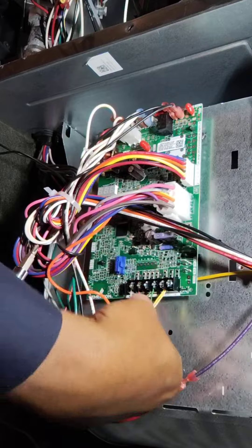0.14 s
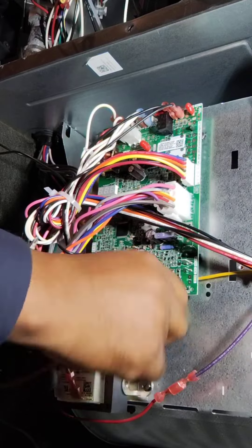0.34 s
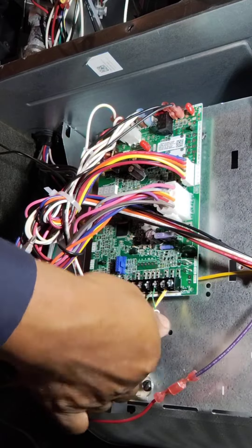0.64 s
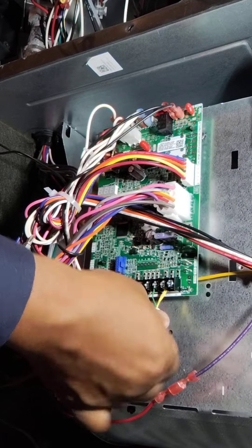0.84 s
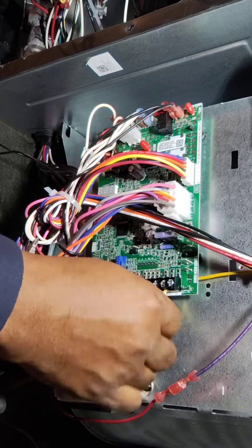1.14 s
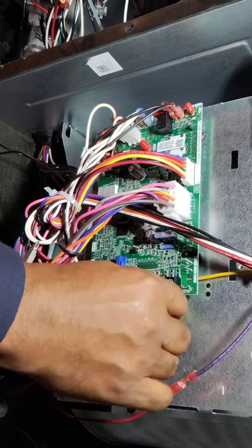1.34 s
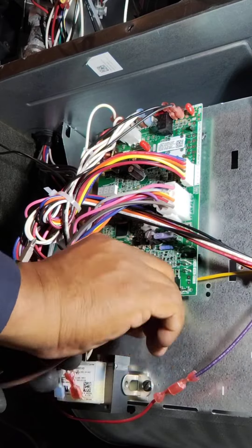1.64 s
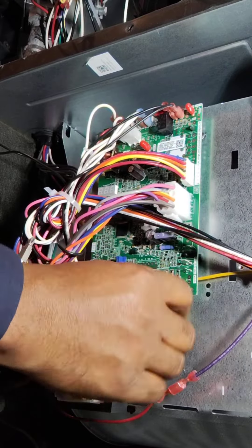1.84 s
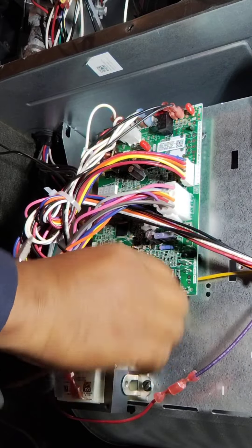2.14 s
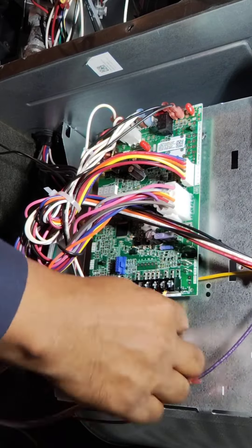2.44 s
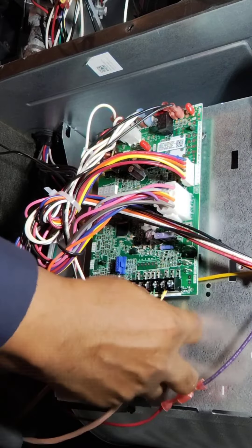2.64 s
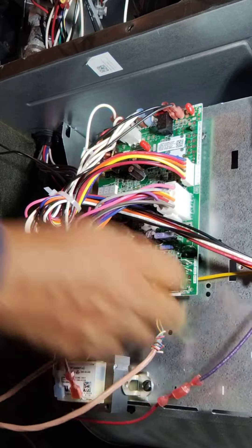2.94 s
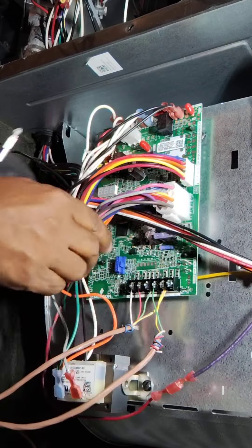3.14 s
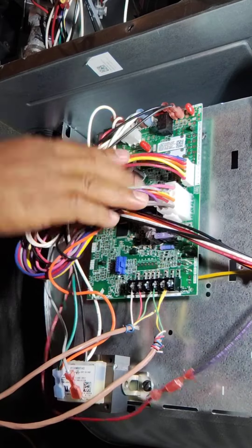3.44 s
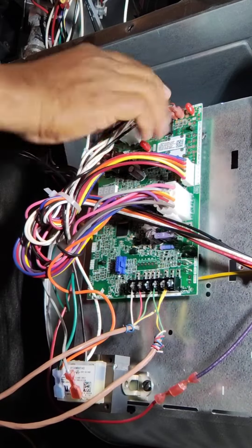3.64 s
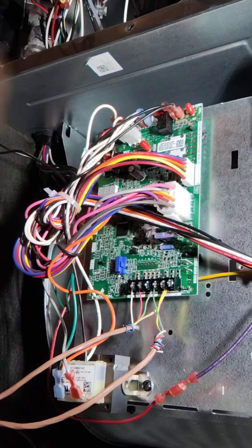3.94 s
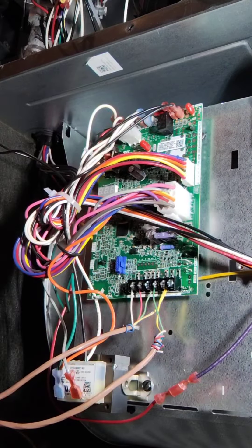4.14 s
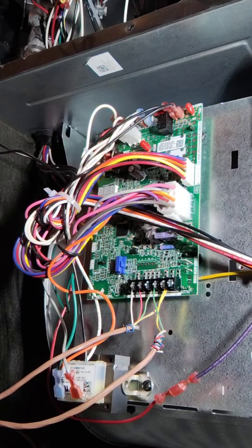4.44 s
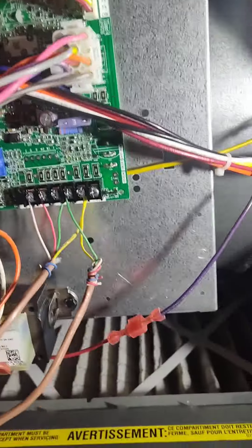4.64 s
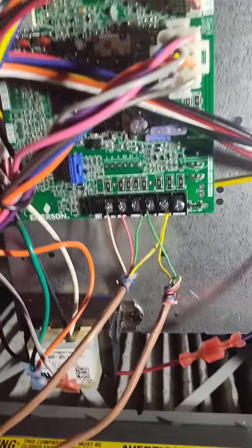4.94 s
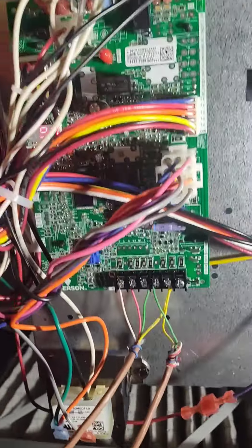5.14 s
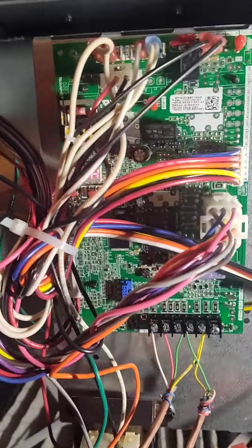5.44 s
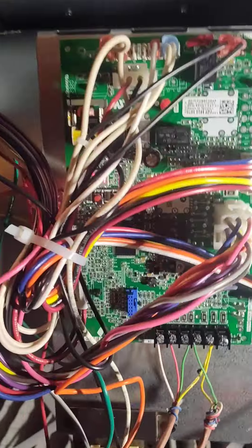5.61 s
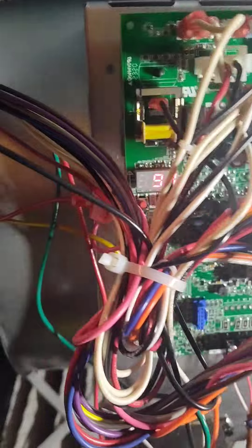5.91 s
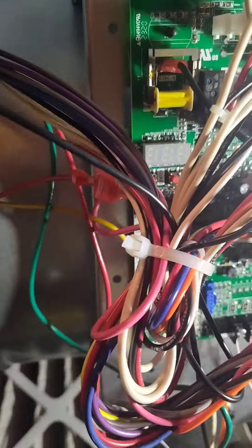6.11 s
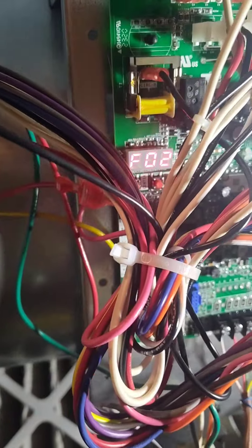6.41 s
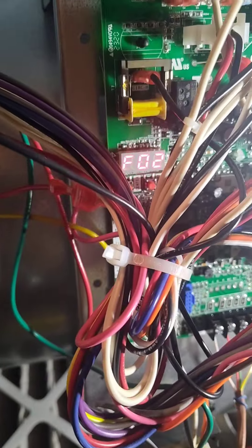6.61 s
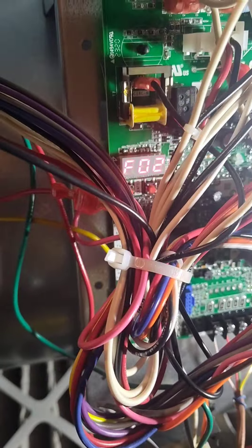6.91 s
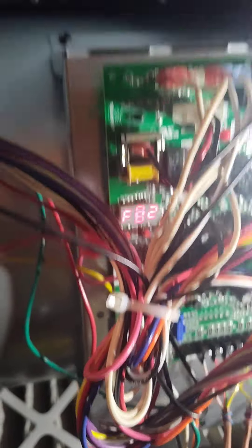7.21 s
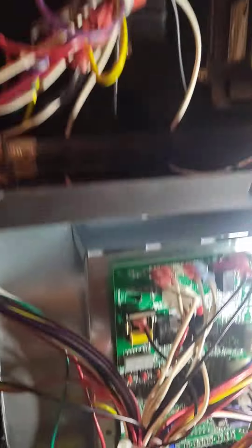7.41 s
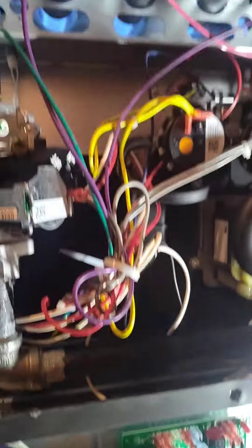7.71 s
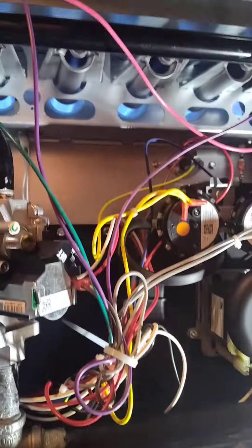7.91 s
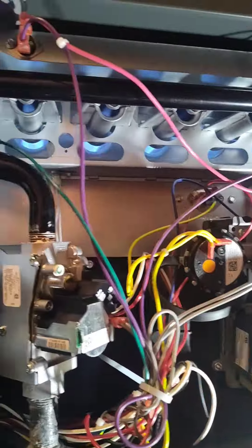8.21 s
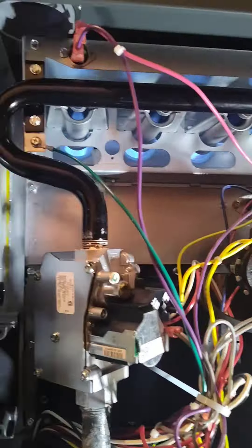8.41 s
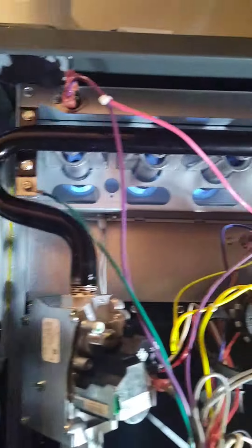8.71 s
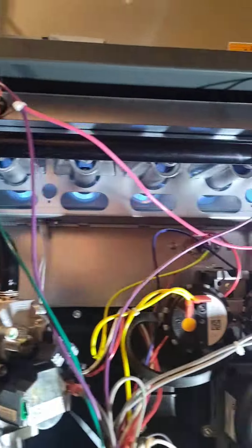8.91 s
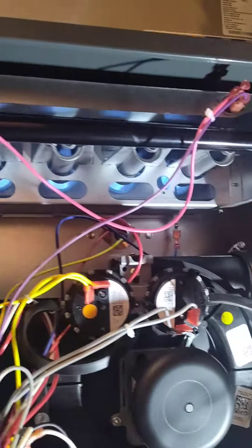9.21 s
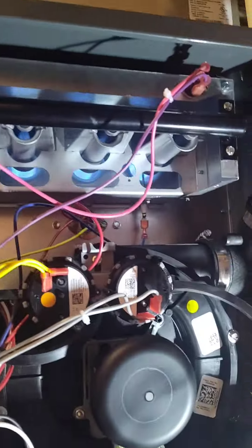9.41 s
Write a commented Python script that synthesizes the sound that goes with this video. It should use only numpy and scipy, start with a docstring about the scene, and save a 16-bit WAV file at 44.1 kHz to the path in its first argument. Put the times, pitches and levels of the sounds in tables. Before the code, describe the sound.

Very quiet hand fumbling with wires and dull sheet-metal knocks over a faint hum, then an abrupt switch to a loud, steady roar of burner flames and rushing air.

```python
"""Faint hum, soft brushing and metallic knocks; a brief silence; then roaring flames and rushing air.
An open gas furnace indoors: the transformer is a sine, hand and sleeve on wiring are shaped noise,
knocked sheet metal is a bank of decaying modes. Fire and air are noise coloured by cabinet resonances.
A handheld pair of microphones moves close to the control board, then up to the burners."""
import sys
import numpy as np
from scipy import signal
from scipy.fft import rfft, irfft
from scipy.io import wavfile
from scipy.ndimage import uniform_filter1d

SR = 44100
rng = np.random.default_rng(int(sys.argv[2]) if len(sys.argv) > 2 else 0)


def transcribe(u):
    """Save the signal u as a 16-bit wav file named by the first command-line argument.

    u: samples, shape (n,) or (channels, n), limited to [-1, 1]; the rate is SR.
    q: integer samples, one column per channel.
    """
    v = np.clip(np.atleast_2d(u).T, -1, 1)
    q = np.round(v * 32767).astype(np.int16)
    wavfile.write(sys.argv[1], SR, q)


N = 421596
FRAME, HOP = 2048, 512  # samples
TIME_S = np.arange(N) / SR
FRAME_S = np.arange(N // HOP + 5) * HOP / SR
BIN_HZ = np.fft.rfftfreq(FRAME, 1 / SR)

ROOM_ENDS_S, FIRE_STARTS_S = 4.501, 4.573
HUM_HZ, HUM_RMS_DB = 119, -61.5
RING_SHORTENS = 0.35  # exponent: higher panel modes die sooner
FLARE_HOLD_S, FLARE_SETTLE_S = 0.9, 0.18
# rasp of the flames just after lighting
RASP_S, RASP_LENGTH_S, RASP_HZ, RASP_WIDTH_HZ, RASP_LIFT_DB = 4.73, 0.48, 1680, 990, 4
BREEZE_DB_PER_HZ = -73  # between gusts, before the wind shape
FAN_NEAREST_S, FAN_SWELL_S = 9.3, 1.44
EDGE_HZ = 14450  # upper band limit

# room noise before panel and rustle: (frequency [Hz], density [dB per Hz])
ROOM_DENSITY = [(30, -109), (65, -99), (110, -89.5), (200, -99), (420, -98.5), (530, -104), (850, -104),
                (1100, -107), (1500, -106), (2000, -112), (7000, -112), (9000, -109), (11000, -115),
                (14500, -116)]
# hand activity among the wires: (time [s], lift [dB])
HAND_BUSY = [(0, 6), (.7, 5), (1.3, -9), (2.0, 2), (2.8, 14.5), (3.3, 21), (4.5, 20)]
# ringing of touched sheet metal: (frequency [Hz], width [Hz], lift [dB])
PANEL_RINGING = [(427, 24, 7.5), (756, 29, 5.5), (874, 30, 6.5), (1040, 84, -0.5), (1440, 32, 4),
                 (1610, 57, -2)]
# strokes of hand and sleeve over the wiring: (time [s], length [s], t60 before band stretch [s],
# level before band spread [dB], brightness [dB], lowest-band body [dB])
RUB_STROKES = [(0.411, .025, 0.65, -64, -4.5, 13.5), (0.518, 0.053, .2, -66.5, 2, 4),
               (0.645, 0.057, 0.21, -70, -3, 4), (0.79, .015, .15, -68, -11, 7),
               (1.358, .015, 0.27, -72, -13, 13), (1.653, .015, .12, -67, -7, 0),
               (1.768, .018, .092, -63, -8, 0), (2.383, .018, 0.14, -52, -15, 2),
               (2.547, 0.085, 0.34, -57.5, -0.5, 4), (2.921, 0.055, .08, -47, 1, -4.5),
               (2.971, .02, 0.44, -54, 12, -13), (3.026, .009, .06, -42.5, -4, 4),
               (3.066, 0.039, 0.11, -52.5, 6.5, -3), (3.106, 0.025, 0.084, -40.5, -8.5, -4),
               (3.24, .012, 0.31, -55, -4, -7), (3.366, .012, 0.19, -55, -0.5, -11),
               (3.433, 0.021, 0.32, -49.5, -8, -5), (3.696, 0.018, 0.2, -52.5, -10, -17),
               (4.003, 0.072, 0.11, -58.5, 4, -1), (4.083, 0.065, 0.17, -35.5, -0.5, 0),
               (4.157, 0.016, 0.62, -42.5, 0.5, -3.5), (4.23, .018, .15, -52, -7, -4),
               (4.376, 0.049, 0.22, -52, -2.5, 3)]
# friction bands: (low edge [Hz], high edge [Hz])
RUB_BANDS_HZ = [(170, 500), (500, 2000), (2000, 6500), (6500, 14000)]
# stroke's share in each friction band: (offset from level [dB], share of brightness [1])
RUB_BAND_SPREAD = [(-3.5, 0.36), (-1.5, 0.12), (-2, 0.68), (-1.5, 1)]
# spectrum shape of the rubbing noise: (frequency [Hz], relative density [dB])
RUB_SHAPE_DB = [(170, -7), (400, -5), (550, -2), (1000, 3), (1600, 1), (2100, -16), (3000, -18.5),
                (3800, -24.5), (5000, -19), (7000, -13.5), (9000, -3), (11000, -14.5), (14000, -14)]
# wires snapping against each other and the metal:
# (time [s], initial level [dB], pitch [Hz], width [Hz], t60 [s])
WIRE_TICKS = [(2.605, -41, 7700, 7000, 0.054), (2.848, -50, 6950, 9000, 0.036),
              (2.918, -31, 8700, 3000, 0.012), (3.243, -40, 3450, 5000, 0.087),
              (3.371, -58, 8000, 8000, .08), (3.701, -53, 9000, 6000, 0.055), (4.025, -48, 8900, 7000, 0.1),
              (4.071, -41, 8800, 7000, 0.083), (4.115, -26.5, 1640, 1600, 0.075)]
# soft knocks on the cabinet: (time [s], level [dB], favoured pitch [Hz], t60 at that pitch [s])
CABINET_KNOCKS = [(.42, -46, 480, .12), (.426, -54, 990, 0.083), (.461, -56, 885, 0.13),
                  (.463, -49, 200, .15), (.497, -48, 423, 0.1), (.519, -56, 885, .14),
                  (.555, -55, 1535, .08), (.64, -63, 1600, 0.11), (.935, -63, 1450, 0.091),
                  (1.918, -57, 450, .08), (1.963, -58, 1530, .07), (2.08, -56, 900, .08),
                  (2.177, -56, 1500, .07), (2.389, -50, 380, 0.14), (2.607, -57, 600, .1),
                  (2.628, -39, 1090, 0.12), (2.753, -55, 1450, 0.072), (2.93, -31, 433, .07),
                  (2.937, -31, 150, .1), (3.028, -27, 560, 0.038), (3.044, -28, 115, 0.14),
                  (3.046, -29, 350, 0.2), (3.074, -25, 130, 0.1), (3.085, -34.5, 850, 0.11),
                  (3.103, -33, 800, 0.063), (3.116, -30, 1350, .05), (3.124, -28, 760, 0.041),
                  (3.245, -36, 1530, 0.045), (3.376, -41, 1410, .07), (3.442, -45, 1490, 0.17),
                  (3.702, -50, 820, .1), (3.868, -52, 800, 0.082), (4.067, -41, 1090, .08),
                  (4.116, -11.5, 181, 0.12), (4.117, -28.5, 1550, 0.089), (4.165, -37, 1250, 0.15),
                  (4.19, -19, 151, .07), (4.232, -41, 115, 0.58), (4.234, -39, 1150, 0.1),
                  (4.325, -43.5, 450, .25), (4.393, -38, 1230, 0.062), (4.404, -35, 190, .1),
                  (4.42, -39, 1400, 0.054)]
# modes of the cabinet panels: (frequency [Hz], relative level [dB])
CABINET_MODES = [(116, 7.5), (170, -7), (199, 0.5), (290, -9), (383, 1.5), (460, -0.5), (590, 1), (760, 4),
                 (885, 0), (1090, -1), (1222, -4.5), (1400, 1), (1530, -1), (1647, -5), (1850, -3),
                 (2810, 4)]

# microphone path: (time [s], closeness to board [0-1], turn towards burners [0-1])
MIC_PATH = [(4.57, 0, 0.06), (5.65, 0.08, 0.09), (6.15, 0.87, 0), (6.65, 0.93, 0), (7.14, 0.8, 0.02),
            (7.28, 0.2, 0.2), (7.48, 0.4, 0.58), (7.85, 0.6, 0.84), (8.2, 0.2, 0.95)]
# coherence of the two microphones: (frequency [Hz], coherence [0-1])
FIRE_COHERENCE = [(50, 0.81), (130, 0.99), (280, 0.88), (550, 0.68), (900, 0.78), (1400, 0.17),
                  (3100, 0.51), (5000, 0.21), (7500, 0.079), (14000, .03)]
ROOM_COHERENCE = [(50, 1), (150, 0.89), (450, 0.91), (900, 0.14), (2000, 0.041), (14000, 0.07)]
# stereo balance: (frequency [Hz], left minus right [dB])
BOARD_BALANCE_DB = [(60, -13), (110, 3), (200, -2.5), (380, 2), (750, -2), (1100, 0), (1500, -3),
                    (2360, 2.5), (4350, 0), (6500, 4.5), (9000, 16.5), (14800, 16.5)]
BURNER_BALANCE_DB = [(60, 2), (110, -1.5), (200, 0), (380, -3), (690, -2), (1280, -7), (2360, -6),
                     (4350, -2.5), (6300, -5.5), (9000, 11), (14800, 3)]
RUB_BALANCE_DB = [(60, 2), (110, -1.5), (200, 1), (380, 0.5), (690, -7), (1280, -13.5), (2360, 0),
                  (4350, 0), (6500, -3), (9000, 12), (14800, 2)]
ROOM_BALANCE_DB = [(60, -15), (110, -2), (200, 0), (380, -0.5), (690, -5), (1280, -7), (2360, 1),
                   (4350, -1), (8030, 4), (14800, 4)]

# Rows by place: in front of the board, close to it, at the burners.
# running furnace: (rumble [dB], flame roar [dB], air rush [dB], gas hiss [dB])
FIRE_BANDS_DB = [(-3.5, 1.5, 1.5, 0.5), (4, 0.5, -1.5, 0.55), (-5, -4, -3, -3.5)]
# draught: (whistle pitch [Hz], level [dB], lag of left microphone [ms])
DRAUGHT_WHISTLE = [(1300, -26, -0.41), (1370, -25, -0.34), (1246, -32, 0.34)]

# centres of rumble, roar, rush and hiss: one value each [Hz]
FIRE_BAND_HZ = [70, 220, 800, 7000]
# lift of the fresh flames in those bands: one value each [dB]
FLARE_LIFT_DB = [1.9, 3, 2.7, 2.85]
# turbulence before cabinet colour: (frequency [Hz], density [dB per Hz])
TURBULENCE_DENSITY = [(25, -65), (55, -67), (90, -49), (200, -52), (350, -54.5), (500, -52.5), (950, -57),
                      (1700, -56.5), (2300, -60), (3500, -57), (5000, -61.5), (7200, -66.5), (12000, -72),
                      (14500, -80.5)]
# cabinet resonances: (frequency [Hz], width [Hz], lift in front of board [dB],
# lift close to board [dB], lift at burners [dB])
CABINET_RESONANCES = [(156, 42, 8, 7.5, 10.5), (260.6, 69.5, 8, 11, 9.5), (530, 217, 2.5, 4, 1.5),
                      (696, 136, -2.5, 12, 2.5), (779, 38, 6.5, 0.5, -0.5), (1381, 187, 5.5, 8, 4.5),
                      (1546, 114, 0.5, 12.5, 2.5), (1675, 210, -1.5, -4.5, -2), (1940, 416, 2.5, 11.5, 3),
                      (2685, 140, -4.5, 15.5, 6.5), (2970, 320, 7, 6, -0.5), (3242, 73, -0.5, 6, 8),
                      (3590, 1340, -1.5, 1.5, -4.5), (4520, 180, 3, 7.5, -5), (5040, 360, 0, 10, 0),
                      (9230, 1730, 8.5, 7, 6)]
# crossed beams of gas-jet hiss: (middle [s], length [s], pitch [Hz], width [Hz], lift [dB])
JET_BEAMS = [(5.306, .55, 3220, 650, 4.5), (5.816, 0.57, 3390, 560, 12), (7.304, 0.13, 3780, 850, 9.5),
             (7.473, 0.12, 3750, 1500, 7)]
# draught fan's bands: (frequency [Hz], width [Hz], lift [dB])
FAN_BANDS = [(232.4, 99, 4.5), (2700, 1100, 5)]
# passed whistling edges: (middle [s], length [s], pitch [Hz], width [Hz], level [dB],
# left minus right [dB], lag of left microphone [ms])
EDGE_WHISTLES = [(4.73, 0.59, 1318, 32, -19, 0.5, -.44), (5.267, .3, 1335, 22, -22, 6, -0.11),
                 (5.782, 0.37, 1340, 17, -20, -7.5, -.25), (7.437, 0.32, 1324, 22, -21, -10, -0.033),
                 (7.5, 0.25, 1225, 36, -25.5, -11, .06), (7.785, 0.13, 1232, 30, -24.5, -7, 0.18)]
# gusts at the microphones: (middle [s], length [s], peak density before wind shape [dB per Hz])
WIND_GUSTS = [(6.627, 0.83, -44), (7.234, 0.14, -41.5), (9.317, 0.05, -47)]


def amp(db):
    """Decibels to gain."""
    return 10 ** (np.asarray(db) / 20)


def unit(x):
    """Scales to rms 1."""
    return x / np.sqrt(np.mean(x ** 2) + 1e-20)


def spectrum(points, hz=BIN_HZ):
    """Joins (Hz, value) points on a log-frequency axis."""
    f, value = np.transpose(points)
    return np.interp(np.log(hz + 1), np.log(f + 1), value)


def follow(rows, t_s=FRAME_S):
    """Interpolates the columns of a curve table at the given times."""
    s, *columns = np.transpose(rows)
    return np.array([np.interp(t_s, s, c) for c in columns])


def blend(position, anchors):
    """Weights (positions x anchors) that cross-fade between neighbouring anchors."""
    return np.transpose([np.interp(position, anchors, row) for row in np.eye(len(anchors))])


def bump(hz, width_hz):
    """Bell of height 1 over the bins, half as high half a width off centre."""
    return 2 ** -((2 * (BIN_HZ - hz) / width_hz) ** 2)


def bell(middle_s, length_s):
    """Swell of height 1 over the frames, half as high half a length off centre."""
    return 2 ** -((2 * (FRAME_S - middle_s) / length_s) ** 2)[:, None]


def here(per_place):
    """Cross-fades one row per place as the microphones move: frames x columns."""
    close, turned = np.clip(follow(MIC_PATH), 0, 1)
    weights = np.transpose([(1 - close) * (1 - turned), close * (1 - turned), turned])
    return weights @ np.array(per_place)


def wander(t_s, top_hz):
    """Slow random drift of rms 1: sines of random phase."""
    rates_hz = np.geomspace(top_hz / 10, top_hz, 20)
    return unit(sum(np.sin(2 * np.pi * (f * t_s + rng.random())) / np.sqrt(f) for f in rates_hz))


def air(density_db, coherence, balance_db, lag_ms=0, direct_hz=750):
    """Noise of a given density (dB per Hz, frames x bins) at two spaced microphones."""
    a, b, c, d = rng.standard_normal((4, len(FRAME_S), len(BIN_HZ)))
    same = np.clip(coherence, 0, 1)
    # bass comes from the whole cabinet; only higher sound has a direction
    directed = 1 - bump(0, 2 * direct_hz) ** 2
    turn = np.exp(2j * np.pi * BIN_HZ * directed * lag_ms / 1000)
    left = a + 1j * b
    right = same * left * turn + np.sqrt(1 - same ** 2) * (c + 1j * d)
    tilt = amp(balance_db)
    z = np.array([left * tilt, right]) * amp(density_db) * np.sqrt(2 / (1 + tilt ** 2))
    z = z.swapaxes(1, 2) * np.sqrt(3 * SR / HOP / 8)  # dB per Hz to STFT scale
    return signal.istft(z, nperseg=FRAME, noverlap=FRAME - HOP)[1][:, :N]


def panel():
    """Lift that the sheet metal gives to anything touching it, in dB over the bins."""
    return sum(db * bump(hz, width) for hz, width, db in PANEL_RINGING)


def room(busy_share=0.26):
    """Faint room noise, coloured by the open cabinet, with the rustle of the moving arm."""
    density_db = spectrum(ROOM_DENSITY) + panel() + busy_share * follow(HAND_BUSY).T
    return air(density_db, spectrum(ROOM_COHERENCE), spectrum(ROOM_BALANCE_DB))


def transformer():
    """The core hums at twice the mains frequency, its level wavering slightly."""
    waver_db = .4 * wander(TIME_S, 5)
    return np.sqrt(2) * amp(HUM_RMS_DB + waver_db) * np.sin(2 * np.pi * HUM_HZ * TIME_S)


def fingers(rms_db=-71, t60_s=0.087, touches_per_s=20):
    """Fingers fidget with the wires: many soft, tiny touches that ring the panel."""
    touches = (rng.random(N) < touches_per_s / SR) * rng.uniform(.4, 1, N)
    t_s = np.arange(SR // 2) / SR
    ring = amp(-60 * t_s / t60_s) * (1 - np.exp(-t_s / .008))
    # touches add in power
    envelope = np.sqrt(abs(signal.oaconvolve(touches ** 2, ring ** 2)[:N]))
    shape_db = spectrum([(200, -10), (800, -2), (1500, 0), (2100, -17), (9000, -21), (14000, -32)])
    density_db = shape_db + panel() + follow(HAND_BUSY).T
    noise = air(density_db, spectrum(ROOM_COHERENCE), spectrum(RUB_BALANCE_DB))
    return amp(rms_db) * unit(envelope * noise)


def rubbing(level_db=0, grain_db=2.0, rise_share=0.48):
    """Each stroke is grainy friction noise that swells, holds briefly and dies away in the cabinet."""
    shape_db = spectrum(RUB_SHAPE_DB) + panel()
    friction = rfft(air(shape_db, spectrum(ROOM_COHERENCE), spectrum(RUB_BALANCE_DB)))
    hz = np.fft.rfftfreq(N, 1 / SR) + 1
    t_s = np.arange(SR // 2) / SR
    power = np.zeros((len(RUB_BANDS_HZ), N))
    # t60 stretch per band: sheet metal rings on after the dry hiss of the contact
    lingers = np.array([1.6, 1.35, 1.23, 1.04])[:, None]
    offset_db, bright_share = np.transpose(RUB_BAND_SPREAD)[:, :, None]
    lowest = np.eye(len(RUB_BANDS_HZ))[:, :1]
    for s, length_s, t60_s, db, bright_db, body_db in RUB_STROKES:
        rise = np.minimum(t_s / (rise_share * length_s), 1)
        decay = amp(-60 * np.maximum(t_s - length_s, 0) / (t60_s * lingers))
        band_db = db + offset_db + bright_share * bright_db + lowest * body_db
        power[:, round(s * SR):][:, :len(t_s)] += (amp(band_db) * rise * decay) ** 2
    bands = [unit(irfft(friction / (1 + (lo / hz) ** 8) / (1 + (hz / hi) ** 8), N))
             for lo, hi in RUB_BANDS_HZ]
    # surfaces catch and slip every few milliseconds
    grain = unit(uniform_filter1d(rng.standard_normal(N), size=220))
    catches = unit(amp(grain_db * grain))
    return amp(level_db) * catches * sum(band * np.sqrt(p) for band, p in zip(bands, power))


def ticks(rise_s=0.0008):
    """A wire snaps free: a burst of noise in one broad resonance that dies at once."""
    out, t_s = np.zeros((2, N)), np.arange(SR // 4) / SR
    hz = np.fft.rfftfreq(len(t_s), 1 / SR)
    balance = amp(np.outer([.5, -.5], spectrum(RUB_BALANCE_DB, hz)))
    for s, db, tick_hz, width_hz, t60_s in WIRE_TICKS:
        resonance = balance / (1 + (2 * (hz - tick_hz) / width_hz) ** 2) ** 2
        noise = rfft(rng.standard_normal((2, len(t_s))))
        burst = unit(irfft(noise * resonance, len(t_s)))
        envelope = np.minimum(t_s / rise_s, 1) * amp(db - 60 * t_s / t60_s)
        out[:, round(s * SR):][:, :len(t_s)] += burst * envelope
    return out


def knocks(rise_s=0.0028, rise_cycles=1.0, reach_octaves=0.27, side_share=1.0):
    """A soft blow swings the panels for a few cycles, most of all the modes near its own pitch."""
    out, t_s = np.zeros((2, N)), np.arange(SR // 2) / SR
    hz, mode_db = np.transpose(CABINET_MODES)[:, :, None]
    rise = 1 - np.exp(-t_s / (rise_s + rise_cycles / hz))
    swings = np.sin(2 * np.pi * hz * t_s) * rise
    balance = amp(side_share * np.outer([.5, -.5], spectrum(RUB_BALANCE_DB, hz[:, 0])))
    for s, db, blow_hz, t60_s in CABINET_KNOCKS:
        share = amp(mode_db) / (1 + (np.log2(hz / blow_hz) / reach_octaves) ** 2)
        rings = swings * amp(-60 * t_s / t60_s * (hz / blow_hz) ** RING_SHORTENS)
        blow = balance @ (share * rings) / np.linalg.norm(share)
        out[:, round(s * SR):][:, :len(t_s)] += amp(db) * blow
    return out


def buffeting(balance_db=-4):
    """Low wind rumble in a few gusts, unrelated at the two microphones."""
    shape_db = spectrum([(25, -24), (50, -15.0), (80, -4.0), (130, -0.5), (250, -14), (700, -44), (14000, -80)])
    gusts = sum(amp(db) * bell(s, length_s) for s, length_s, db in WIND_GUSTS)
    wind = amp(BREEZE_DB_PER_HZ) + gusts
    return air(shape_db + 20 * np.log10(wind), 0, balance_db)


def whistle(hz, width_hz, db):
    """Power per Hz of one noisy resonance."""
    return amp(db) ** 2 / (1 + ((BIN_HZ - hz) / width_hz) ** 2) ** 2 / (width_hz * np.pi / 2)


def draught(coherence=0.8, balance_db=-3, width_hz=29):
    """Air drawn past edges sings in narrow, noisy resonances; passed edges swell from their own sides."""
    hz, db, lag_ms = here(DRAUGHT_WHISTLE).T[:, :, None]
    tones = [(whistle(hz, width_hz, db), balance_db, lag_ms)]
    for s, length_s, *tone, side_db, edge_lag_ms in EDGE_WHISTLES:
        tones.append((bell(s, length_s) * whistle(*tone), side_db, edge_lag_ms))
    # power-weighted side and lag per bin
    power = sum(p for p, _, _ in tones)
    mean_balance_db = sum(p * side_db for p, side_db, _ in tones) / power
    mean_lag_ms = sum(p * lag for p, _, lag in tones) / power
    return air(10 * np.log10(power), coherence, mean_balance_db, mean_lag_ms)


def burners(patch_db=1.5, far_coherence=0.67):
    """Turbulent flame and air that flare and settle, coloured by the cabinet differently at each place."""
    lag_ms = here(DRAUGHT_WHISTLE)[:, -1:]
    lifts_db = sum(np.outer(lift_db, bump(hz, width)) for hz, width, *lift_db in CABINET_RESONANCES)
    # reflections between metal walls: fine mid-range ripple, different at each place
    ripple = unit(uniform_filter1d(rng.standard_normal(lifts_db.shape), size=3, axis=1))
    lifts_db = lifts_db + .9 * ripple * (1 - bump(0, 1200)) * bump(0, 12000)

    # flames flare, hold, then settle
    flare = np.clip(1 - (FRAME_S - FIRE_STARTS_S - FLARE_HOLD_S) / FLARE_SETTLE_S, 0, 1)
    band_db = here(FIRE_BANDS_DB) + np.outer(flare, FLARE_LIFT_DB)
    band_weights = blend(np.log(BIN_HZ + 1), np.log(FIRE_BAND_HZ))
    density_db = spectrum(TURBULENCE_DENSITY) + band_db @ band_weights.T + here(lifts_db)
    density_db += sum(db * bell(s, length_s) * bump(hz, width)
                      for s, length_s, hz, width, db in JET_BEAMS)
    density_db += RASP_LIFT_DB * bell(RASP_S, RASP_LENGTH_S) * bump(RASP_HZ, RASP_WIDTH_HZ)
    # microphones swing towards the draught fan at the end
    fan_db = sum(db * bump(hz, width) for hz, width, db in FAN_BANDS)
    density_db += bell(FAN_NEAREST_S, FAN_SWELL_S) * fan_db
    # eddies come and go above the bass
    eddies = uniform_filter1d(rng.standard_normal(density_db.shape), size=7, axis=0)
    eddies = uniform_filter1d(eddies, size=16, axis=1)
    density_db += patch_db * unit(eddies) * (1 - bump(0, 1140))

    # beside the row of burners sound arrives from many directions
    at_burners = np.clip(follow(MIC_PATH)[1], 0, 1)[:, None]
    loss = at_burners * (1 - far_coherence) * (1 - bump(0, 1500))
    coherence = spectrum(FIRE_COHERENCE) * (1 - loss)
    board_db, burner_db = spectrum(BOARD_BALANCE_DB), spectrum(BURNER_BALANCE_DB)
    balance_db = (1 - at_burners) * board_db + at_burners * burner_db
    return air(density_db, coherence, balance_db, lag_ms)


def scene(onset_dip_db=5, build_s=0.096):
    """Quiet work on the wiring, a brief silence, then the fire, which builds quickly."""
    work = room() + transformer() + fingers() + rubbing() + ticks() + knocks()
    idle = work * (TIME_S < ROOM_ENDS_S)
    age_s = np.maximum(TIME_S - FIRE_STARTS_S, 0)
    start = np.minimum(age_s / .001, 1)
    build = amp(-onset_dip_db * np.exp(-age_s / build_s))
    return idle + (burners() + draught() + buffeting()) * start * build


def record(dry):
    """Full-scale limit, then the band limit."""
    lowpass = signal.firwin(511, EDGE_HZ, window=("kaiser", 9), fs=SR)
    return signal.oaconvolve(np.clip(dry, -1, 1), lowpass[None], "same")


dry = scene()
out = record(dry)
transcribe(out)
```